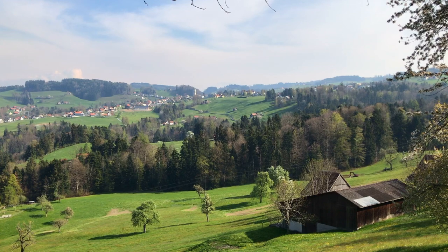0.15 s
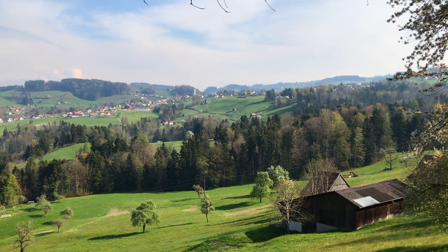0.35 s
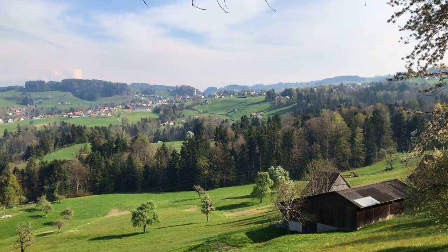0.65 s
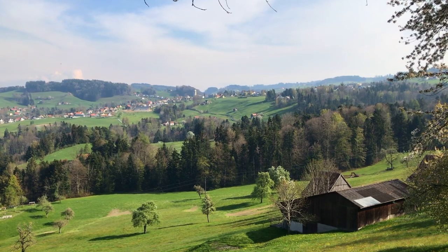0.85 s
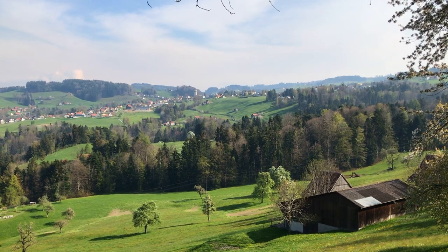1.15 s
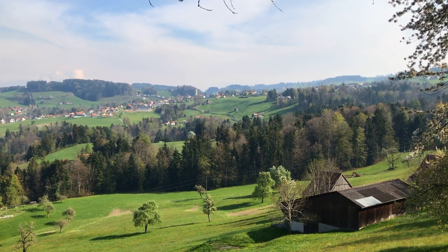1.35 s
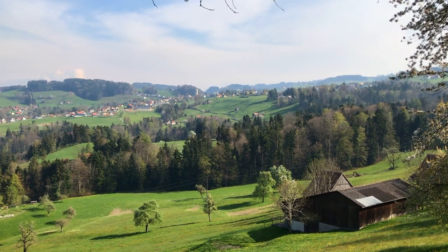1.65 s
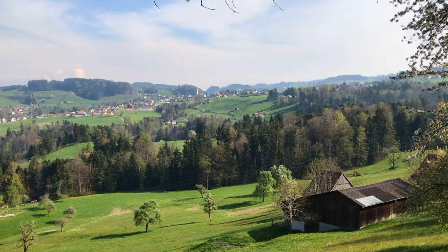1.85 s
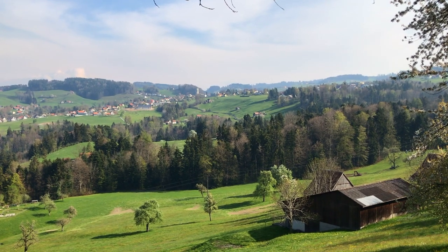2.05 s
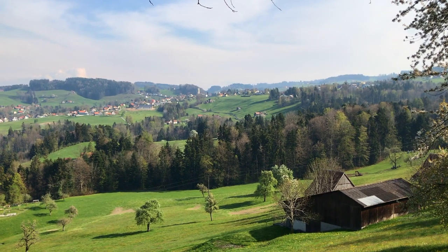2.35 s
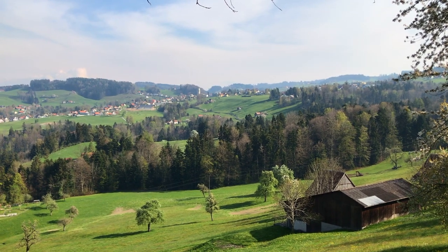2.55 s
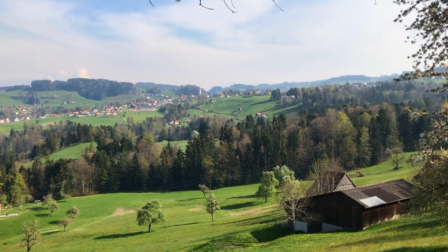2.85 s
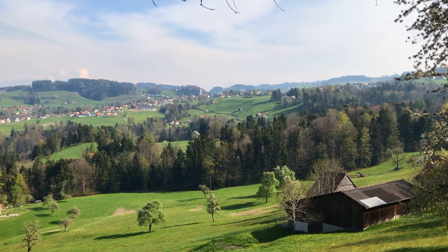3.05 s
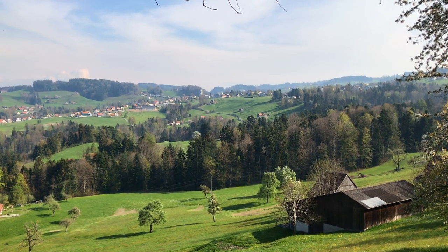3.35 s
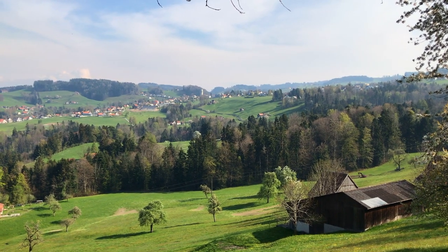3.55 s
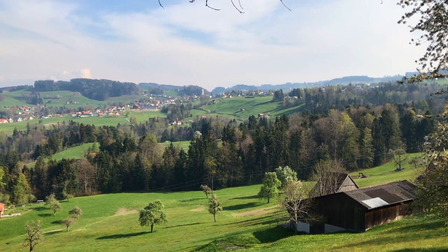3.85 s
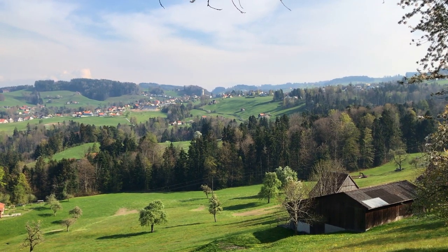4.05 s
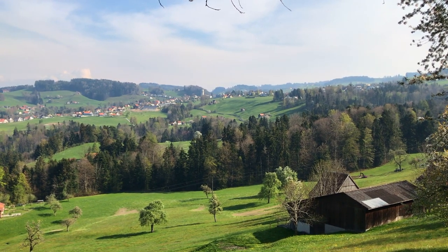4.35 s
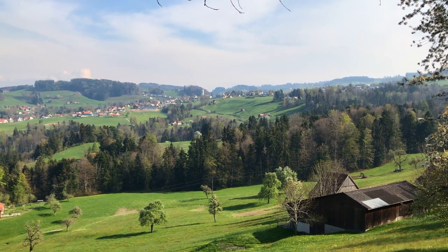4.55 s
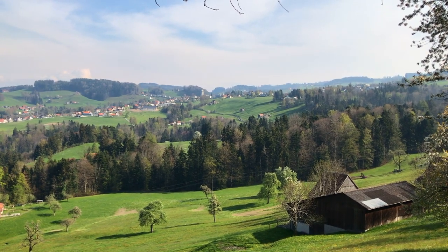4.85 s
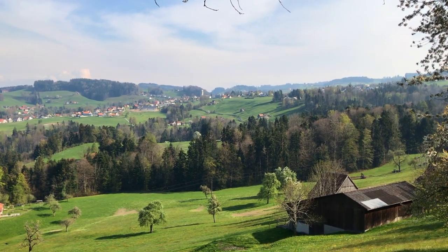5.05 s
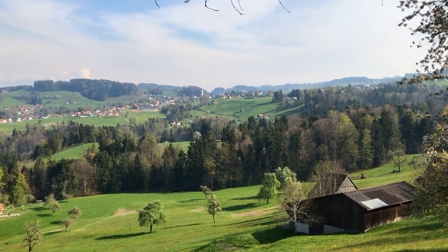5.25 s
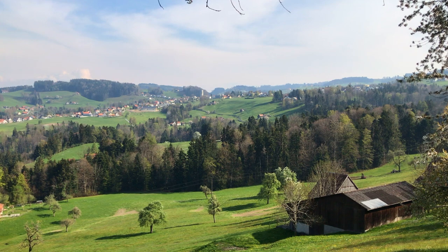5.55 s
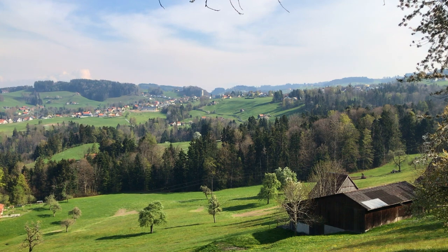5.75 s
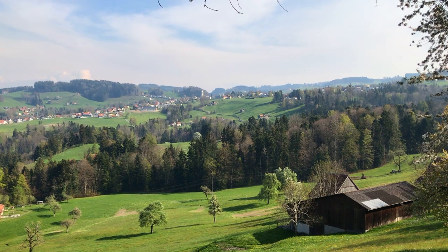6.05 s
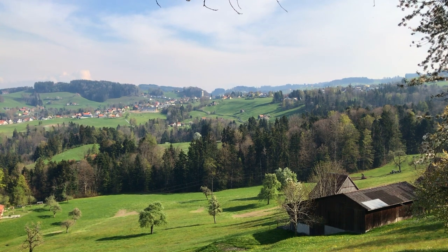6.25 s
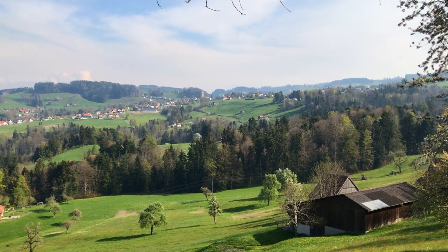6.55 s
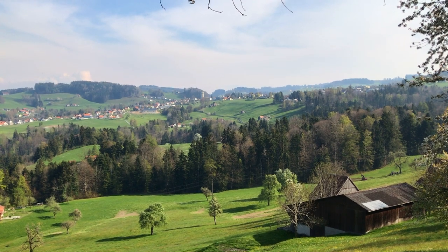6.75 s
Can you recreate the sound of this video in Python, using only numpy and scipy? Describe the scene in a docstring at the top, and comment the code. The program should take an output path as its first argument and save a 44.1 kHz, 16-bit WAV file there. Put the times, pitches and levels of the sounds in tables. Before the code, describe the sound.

Small birds sing in open countryside beside a wood, fading in over a soft rumble of far traffic and breeze. The closest give quick chirps, sliding whistles and tiny rasps, while distant ones answer with lower warbled phrases and runs of high pips. A few light taps come close to the microphone. In the second half the breeze swells a little and the singing becomes louder and more crowded.

```python
"""Birdsong above a wooded valley

Small birds whistle on a hillside, each syrinx nearly a sine: one or two close by, others far off with
low warbled phrases. Leaves and trunks scatter every note into a short tail. Distant traffic and wind
rumble underneath as shaped noise, a few small taps sound nearby, and the whole scene fades in."""
import sys
import numpy as np
from scipy import signal
from scipy.fft import rfft, irfft
from scipy.io import wavfile
from scipy.ndimage import uniform_filter1d

SR = 44100
rng = np.random.default_rng(int(sys.argv[2]) if len(sys.argv) > 2 else 0)


def unload_wav(signal):
    """Save mono or channel-first audio to the path in sys.argv[1] as 16-bit WAV at rate SR, clipped to [-1, 1]."""
    wavfile.write(
        sys.argv[1],
        SR,
        np.round(np.clip(np.atleast_2d(signal).T, -1, 1) * 32767).astype(np.int16),
    )


N = 304731
TOP_HZ = 15760


def gain_of(db):
    """Decibels to amplitude."""
    return 10 ** (np.asarray(db) / 20)


def unit_rms(x):
    """Scales to rms 1."""
    return x / np.sqrt(np.mean(x ** 2) + 1e-20)


def curve_at(points, hz):
    """Reads a table on a log-frequency axis."""
    f, value = np.transpose(points)
    return np.interp(np.log(hz + 1), np.log(f + 1), value)


def add(mix, s, sound):
    """Mixes a sound in at time s."""
    part = mix[max(round(s * SR), 0):][:len(sound)]
    part += sound[:len(part)]


def drift(count, rate_hz):
    """Smooth random modulation, rms about 1, that rolls off above the given rate."""
    size = 32768
    hz = np.fft.rfftfreq(size, 1 / SR)
    return unit_rms(irfft(rfft(rng.standard_normal(size)) * np.exp(-(hz / rate_hz) ** 2)))[:count]


def progress(length_s):
    """Runs from 0 to 1 through a note."""
    return np.linspace(0, 1, int(length_s * SR))


def glide(length_s, start_hz, end_hz):
    """Pitch that moves at a steady rate."""
    return start_hz + (end_hz - start_hz) * progress(length_s)


def fall(length_s, start_hz, end_hz, settle):
    """Pitch that drops, then levels out over `settle` time constants as the syrinx relaxes."""
    return start_hz + (end_hz - start_hz) * np.expm1(-settle * progress(length_s)) / np.expm1(-settle)


def arch(length_s, start_hz, middle_hz, end_hz):
    """Pitch that bows away from a steady glide along a parabola."""
    bow = 1 - (2 * progress(length_s) - 1) ** 2
    return glide(length_s, start_hz, end_hz) + (middle_hz - (start_hz + end_hz) / 2) * bow


def whistle(hz, level_db, overtone_db, edge_s, third_db=-3):
    """A syrinx: nearly a sine, with two overtones that grow as the bird strains for high notes."""
    phase = 2 * np.pi * np.cumsum(hz) / SR
    strain = gain_of(overtone_db + np.interp(hz, [3600, 5400], [-16, 0]))
    third = gain_of(third_db) * np.sin(3 * phase) * (3 * hz < SR / 2)
    tone = np.sin(phase) + strain * (np.sin(2 * phase) + third)
    fades = signal.windows.tukey(len(hz), min(1, 2 * edge_s * SR / len(hz)))
    return np.sqrt(2) * gain_of(level_db) * tone * fades


# Spectrum of the traffic and wind bed: (frequency [Hz], relative level [dB])
VALLEY_SPECTRUM = [(18, -54), (27, -22), (38, -8), (55, -1), (80, -6), (130, -10), (225, -15.5), (320, -17),
                   (430, -22.5), (650, -23.5), (1000, -17.5), (1700, -26), (3000, -29.5), (5000, -35.5),
                   (8000, -45), (15500, -50.5)]
# Swell of the breeze: (time [s], strength [dB])
BREEZE_SWELL = [(0, 0), (1.5, -5.5), (2.2, -4.5), (2.7, -1.5), (3.3, 1.5), (4.2, 4), (4.8, 5.5), (5.5, 6.5),
                (6.9, 4)]


def valley(level_db=-50.5, patchy_db=0.88, drone_db=4.0, drone_hz=265, fizz_share=0.77):
    """Far traffic in drifting patches, its drone easing off; a breeze lifts rumble and faint fizz."""
    size, hop = 4096, 1024
    frames, hz = N // hop + 5, np.fft.rfftfreq(size, 1 / SR)
    t = np.arange(frames)[:, None] * hop / SR
    real, imag, patches = rng.standard_normal((3, frames, len(hz)))
    patches = unit_rms(uniform_filter1d(uniform_filter1d(patches, size=5, axis=0), size=30, axis=1))
    rumble_and_fizz = 1 / (1 + (hz / 130) ** 2) + fizz_share * hz / TOP_HZ
    breeze_db = np.interp(t, *np.transpose(BREEZE_SWELL)) * rumble_and_fizz
    engine_db = drone_db * np.interp(t, [3.2, 3.7], [1, 0]) * np.exp(-((hz - drone_hz) / 60) ** 2)
    tyres_db = 2.5 * np.exp(-((t - 3.1) / 1.3) ** 2) * np.exp(-np.log((hz + 1) / 850) ** 2)
    bed_db = curve_at(VALLEY_SPECTRUM, hz) + patchy_db * patches + breeze_db + engine_db + tyres_db
    spectra = (real + 1j * imag) * gain_of(bed_db)
    noise = signal.istft(spectra.T, nperseg=size, noverlap=size - hop)[1][:N]
    return gain_of(level_db) * unit_rms(noise)


def scatter(x, t60, delay_s, echoes_per_s=6000):
    """Reverb of many small echoes of random sign; each band dies away in t60(hz) seconds."""
    echoes = rng.choice([-1, 1], SR) * (rng.random(SR) < echoes_per_s / SR)
    hz, t, spectra = signal.stft(echoes, SR, nperseg=256)
    tail = signal.istft(spectra * gain_of(-60 * t / t60(hz)[:, None]), SR)[1]
    tail = np.concatenate([np.zeros(int(delay_s * SR)), tail])
    return signal.fftconvolve(x, tail / np.linalg.norm(tail))[:N]


# Reverb time among the trees: (frequency [Hz], 60 dB decay time [s])
WOOD_DECAY = [(1500, 0.12), (3000, 0.41), (5000, 0.53), (9000, 0.6), (15000, 0.47)]


def wood(x):
    """The trees further off return a later, longer tail."""
    return scatter(x, lambda hz: curve_at(WOOD_DECAY, hz), delay_s=.03)


def foliage(x):
    """The nearest branches smear each note briefly; twigs and leaves scatter high pitches most."""
    echo = scatter(x, lambda hz: np.full_like(hz, .18), delay_s=.005)
    treble_db = curve_at([(3000, 0), (5500, 4), (10000, 6)], np.fft.rfftfreq(N, 1 / SR))
    return irfft(rfft(echo) * gain_of(treble_db), N)


def chorus(count=170, level_db=-68, first_s=1.2, quiet_s=3.3, early_share=.08):
    """Faint quick glides from birds deep in the wood: a few at first, many after the quiet opening."""
    out = np.zeros(N)
    for when, pitch, slope, span, faintness in rng.random((count, 5)):
        samples = int((0.0199 + .06 * span) * SR)
        centre_hz = 2050 + 2000 * pitch ** 2
        hz = centre_hz * (1 + 0.303 * (slope - .5) * np.linspace(-1, 1, samples))
        hz *= 1 + 0.0226 * drift(samples, rate_hz=90)
        s = np.interp(when, [0, early_share, 1], [first_s, quiet_s, N / SR])
        add(out, s, whistle(hz, level_db - 7 * faintness, overtone_db=-30, edge_s=.007))
    return out


# Small dry taps: (time [s], pitch [Hz], peak level [dB])
DRY_TAPS = [(2.181, 1520, -43.5), (2.376, 1180, -40.5), (2.555, 1120, -38.5), (3.618, 1150, -37),
            (3.68, 1420, -38.5), (4.252, 1700, -35), (4.2572, 1560, -33.5), (4.4025, 1190, -31)]


def taps(half_width_cycles=.92):
    """Each tap is a cycle or two with no ring."""
    out, t = np.zeros(N), np.arange(-200, 200) / SR
    for s, hz, peak_db in DRY_TAPS:
        envelope = gain_of(peak_db) * np.exp(-(t * hz / half_width_cycles) ** 2)
        add(out, s + t[0], envelope * np.cos(2 * np.pi * hz * t))
    return out


def far_note(hz, level_db, depth_hz, warble_hz=61):
    """A low fluted note with a fast uneven warble; the long path makes it flutter."""
    count = len(hz)
    uneven_rate_hz = warble_hz * (1 + .1 * drift(count, rate_hz=25))
    warble = np.sin(2 * np.pi * np.cumsum(uneven_rate_hz) / SR)
    flutter_db = 1.8 * drift(count, rate_hz=50)
    pitch_hz = hz + depth_hz * warble + 18 * drift(count, rate_hz=75)
    return whistle(pitch_hz, level_db + flutter_db, overtone_db=-23, edge_s=0.0054)


# Distant fluted glides: (time [s], length [s], start [Hz], end [Hz], level [dB])
FLUTED_GLIDES = [(0.094, 0.045, 2900, 2470, -58), (0.593, .066, 2647, 2600, -58.5),
                 (1.355, .05, 2200, 1750, -64), (1.563, 0.17, 1990, 2030, -65),
                 (2.025, 0.023, 2670, 2620, -64), (2.26, .2, 2180, 2306, -69.5),
                 (2.987, 0.087, 2395, 2500, -66), (3.407, .11, 2054, 2024, -64.5),
                 (3.681, 0.13, 2373, 2137, -59), (3.94, .18, 2244, 1980, -65),
                 (4.198, 0.076, 2477, 2334, -62), (4.426, 0.018, 2630, 2570, -56),
                 (4.432, 0.13, 2055, 2030, -64), (4.531, 0.025, 2065, 2510, -52),
                 (5.249, 0.03, 1900, 2500, -61), (5.285, 0.14, 2280, 2040, -61),
                 (5.791, 0.029, 2466, 1940, -51), (5.876, 0.059, 2440, 2296, -47.5),
                 (6.335, 0.057, 2410, 2800, -56), (6.388, 0.029, 2530, 1904, -50.5)]
# Distant warbles: (time [s], length [s], start [Hz], middle [Hz], end [Hz], level [dB])
WARBLES = [(3.948, 0.11, 2720, 2640, 2570, -65), (4.128, 0.043, 2720, 2635, 2500, -53),
           (4.174, 0.027, 2470, 2440, 2410, -48.5), (4.566, 0.13, 2780, 3195, 2080, -54.5),
           (4.815, 0.077, 1973, 2140, 2160, -54), (4.988, 0.072, 1890, 2130, 2040, -54.5),
           (5.933, 0.18, 2400, 2406, 2540, -52.5), (6.238, 0.11, 2163, 2157, 1980, -61),
           (6.526, 0.15, 2386, 2427, 2660, -51.5)]


def far_song():
    """Distant birds: nearly plain glides and deeply warbled notes."""
    out = np.zeros(N)
    for s, *contour, level_db in FLUTED_GLIDES:
        add(out, s, far_note(glide(*contour), level_db, depth_hz=19))
    for s, *contour, level_db in WARBLES:
        add(out, s, far_note(arch(*contour), level_db, depth_hz=86))
    return out


# Runs of thin high pips: (time [s], pips [count], level [dB])
HIGH_PIP_RUNS = [(0.152, 3, -56.5), (1.315, 4, -65), (2.365, 4, -67.5), (3.13, 4, -66.5), (4.205, 5, -63.5),
                 (4.765, 4, -62.5), (5.242, 2, -64), (5.774, 4, -61), (6.315, 4, -62.5), (6.79, 3, -60)]


def pips(gap_s=0.041, length_s=0.031, first_hz=4720, last_hz=4830, fall_hz=130, swell_db=4, sag_db=5):
    """Quick runs of falling pips that each die away; each run climbs a little and grows louder."""
    out, down_ramp = np.zeros(N), .5 - progress(length_s)
    for s, repeats, level_db in HIGH_PIP_RUNS:
        for k, along in enumerate(np.linspace(0, 1, round(repeats))):
            hz = first_hz + (last_hz - first_hz) * np.sqrt(along) + fall_hz * down_ramp
            hz += 35 * drift(len(hz), rate_hz=110)
            pip_db = level_db + swell_db * (along - .5) + sag_db * down_ramp
            pip = whistle(hz, pip_db, overtone_db=-14, edge_s=.004)
            add(out, s + k * gap_s + 0.0022 * rng.standard_normal(), pip)
    return out


# Higher rasps tend to shake wider: (centre [Hz], rms pitch spread [Hz])
RASP_SHAKE = [(3000, 277), (4700, 227), (5000, 480), (5700, 390), (7500, 1110)]


def rasp(length_s, centre_hz, level_db):
    """A hoarse burst: a whistle whose pitch shakes wildly and whose level turns grainy."""
    count = int(length_s * SR)
    hz = centre_hz + curve_at(RASP_SHAKE, centre_hz) * drift(count, rate_hz=870)
    grain_db = 2 * drift(count, rate_hz=500)
    return whistle(hz, level_db + grain_db, overtone_db=-18.5, edge_s=.011)


def close_note(hz, level_db, crest, onset_db=-10.5, release_db=-8):
    """A quavering note that swells to its crest (0-1 of its length) and dies back."""
    count = len(hz)
    corners = [0, np.clip(crest, .05, .95), 1]
    swell_db = np.interp(np.linspace(0, 1, count), corners, [onset_db, 0, release_db])
    quaver = 1 + .013 * drift(count, rate_hz=300)
    flutter_db = 2.4 * drift(count, rate_hz=130)
    return whistle(hz * quaver, level_db + swell_db + flutter_db, overtone_db=-29, edge_s=0.00058)


# Whistles that fall and settle: (time [s], length [s], start [Hz], end [Hz], level [dB], crest [0-1])
CLOSE_SLURS = [(1.505, 0.044, 3910, 3800, -56, .5), (1.627, 0.068, 3440, 3070, -47, 0.9),
               (3.432, 0.057, 2950, 2280, -49, 0.66), (3.763, 0.054, 5470, 4720, -47, .5),
               (4.72, 0.018, 3620, 3480, -44, 0.4), (5.054, 0.072, 3490, 2690, -40.5, 0.19),
               (5.161, .097, 4130, 3500, -33, 0.6), (5.259, .038, 3467, 3390, -35, 0.32),
               (5.409, 0.085, 3240, 2710, -43, 0.26), (5.697, 0.024, 4115, 4034, -42, 0.2),
               (5.729, 0.088, 2964, 2733, -45.5, 0.16), (5.999, .1, 3907, 3290, -33.5, 0.04),
               (6.436, 0.052, 3040, 2627, -37.5, 0.63), (6.603, 0.081, 5910, 2950, -36.5, 1),
               (6.787, 0.053, 3726, 2870, -36.5, 0.54), (6.846, 0.047, 3000, 2814, -42.5, .45)]
# Quick downward flicks: (time [s], length [s], start [Hz], end [Hz], level [dB])
CLOSE_CHIPS = [(1.482, .015, 4620, 3430, -46.5), (1.868, 0.012, 6720, 4440, -41.5),
               (2.004, 0.016, 4380, 3170, -52), (2.237, 0.018, 4700, 3060, -46),
               (3.817, 0.028, 4410, 2800, -39.5), (3.986, 0.016, 6280, 4620, -40.5),
               (4.039, 0.014, 6700, 3520, -56), (4.157, 0.015, 6280, 3680, -55),
               (4.713, 0.0101, 4950, 3570, -47), (5.558, 0.032, 6030, 4330, -61),
               (5.84, .035, 4480, 2980, -37), (5.987, 0.014, 4850, 3840, -36.5)]
# Arched notes: (time [s], length [s], start [Hz], middle [Hz], end [Hz], level [dB])
CLOSE_ARCHES = [(1.02, 0.037, 3740, 3820, 3720, -52), (1.111, 0.12, 2740, 2894, 2710, -51.5),
                (1.781, .038, 3020, 3340, 2650, -42.5), (3.612, 0.027, 4400, 5950, 3150, -48),
                (4.137, .023, 5400, 6720, 6560, -62), (4.283, .044, 5900, 6900, 3940, -65),
                (3.257, 0.16, 3200, 3413, 3223, -47.5), (4.536, 0.034, 3600, 5540, 4860, -44),
                (4.857, 0.0847, 3480, 3636, 3385, -36.5), (5.332, 0.03, 5070, 4750, 3670, -39),
                (5.438, 0.077, 3720, 4010, 3960, -50), (6.084, 0.05, 4140, 4140, 4160, -45),
                (6.332, 0.11, 2960, 3450, 3142, -35.5)]
# Upward glides: (time [s], length [s], start [Hz], end [Hz], level [dB])
CLOSE_RISES = [(1.946, 0.029, 5010, 5220, -43.5), (1.972, .016, 5220, 6150, -51),
               (2.122, 0.12, 3050, 3306, -49.5), (2.258, 0.022, 3220, 3510, -45.5),
               (3.084, 0.087, 2773, 3020, -50.5), (3.918, 0.042, 3910, 4030, -48),
               (3.963, .025, 4080, 4520, -50), (3.931, 0.054, 7760, 8580, -59.5),
               (4.065, 0.036, 3450, 3950, -65), (4.177, .035, 3200, 3600, -61),
               (4.335, 0.028, 3360, 3900, -56), (5.248, 0.038, 3850, 4640, -49)]
# Hoarse bursts: (time [s], length [s], centre [Hz], level [dB])
CLOSE_RASPS = [(1.328, .056, 2895, -57), (1.969, 0.055, 4230, -46.5), (1.977, 0.043, 5610, -59),
               (3.118, 0.036, 3070, -50.5), (3.622, 0.036, 7120, -52.5), (3.928, 0.042, 5530, -58),
               (3.986, 0.031, 7900, -57.5), (4.552, 0.067, 4950, -48.5), (4.562, 0.032, 7330, -55),
               (4.867, 0.026, 3850, -46), (4.935, 0.098, 2960, -54.5), (4.937, 0.038, 5750, -60.5),
               (5.335, 0.029, 4700, -48), (5.782, .037, 2975, -46), (6.603, 0.038, 5000, -44)]


def close_song():
    """The foreground birds: whistled slurs, chips, arches and rises, broken by rasps."""
    out = np.zeros(N)
    for s, *contour, level_db, crest in CLOSE_SLURS:
        add(out, s, close_note(fall(*contour, settle=1.8), level_db, crest))
    for s, *contour, level_db in CLOSE_CHIPS:
        add(out, s, close_note(fall(*contour, settle=0.89), level_db, crest=0.61))
    for s, *contour, level_db in CLOSE_ARCHES:
        add(out, s, close_note(arch(*contour), level_db, crest=0.58))
    for s, *contour, level_db in CLOSE_RISES:
        add(out, s, close_note(glide(*contour), level_db, crest=0.64))
    for s, length_s, centre_hz, level_db in CLOSE_RASPS:
        add(out, s, rasp(length_s, centre_hz, level_db))
    return out


def scene():
    """Mono mix: the birds feed two reverbs, over dry taps and the valley bed."""
    close = gain_of(-3.0) * close_song()
    far = gain_of(0.83) * far_song()
    high = gain_of(-1.5) * pips()
    crowd = chorus()  # heard only through the reverbs
    foliage_send = gain_of(-3.8) * close + gain_of(-13) * high + gain_of(-6) * far + crowd
    wood_send = gain_of(-13) * close + gain_of(-9) * far + gain_of(-12) * high + gain_of(-2) * crowd
    return (close + far + high + foliage(foliage_send) + wood(wood_send) + taps() + valley())[None]


def record(dry, fade_s=1.96):
    """A linear fade-in, then a steep low-pass."""
    faded = dry * np.minimum(np.arange(N) / SR / fade_s, 1)
    lowpass = signal.firwin(511, TOP_HZ, window=("kaiser", 9), fs=SR)
    return signal.oaconvolve(faded, lowpass[None], "same")


dry = scene()
out = record(dry)
unload_wav(out)
```